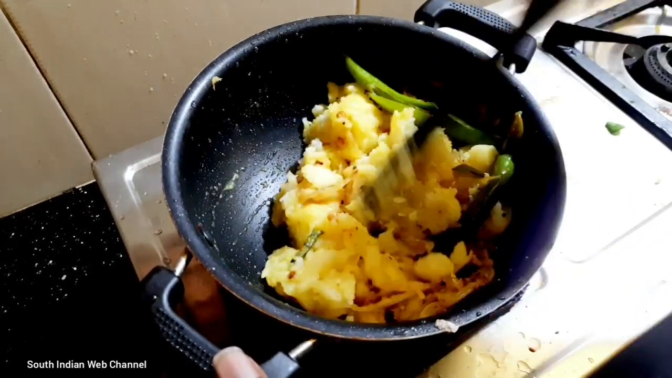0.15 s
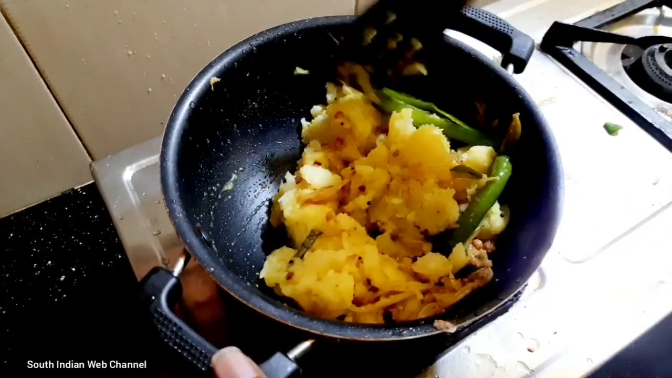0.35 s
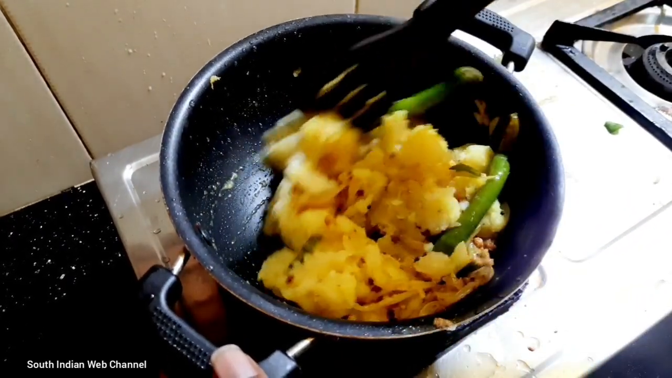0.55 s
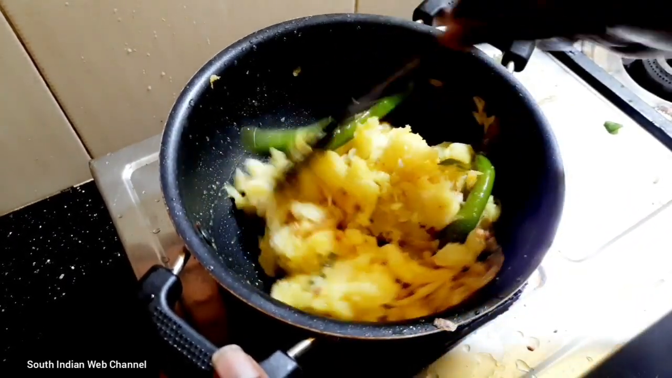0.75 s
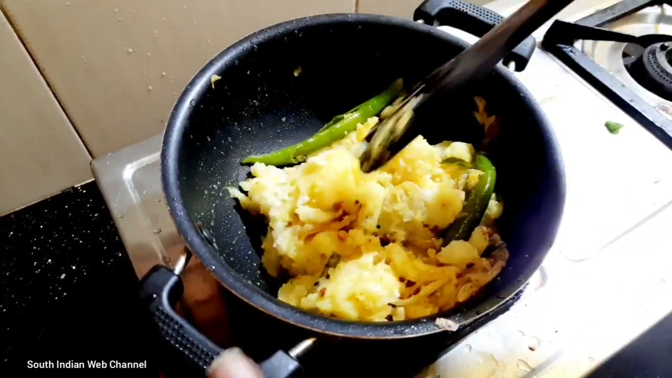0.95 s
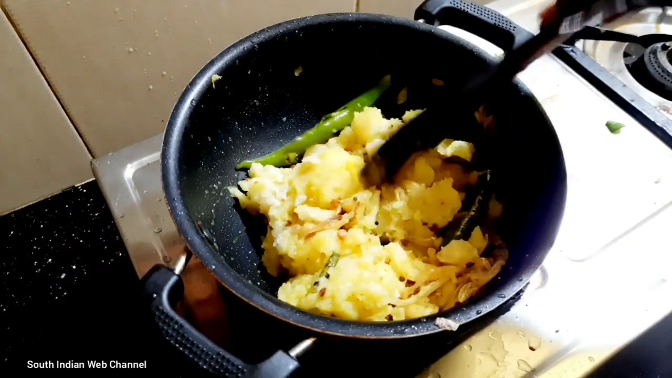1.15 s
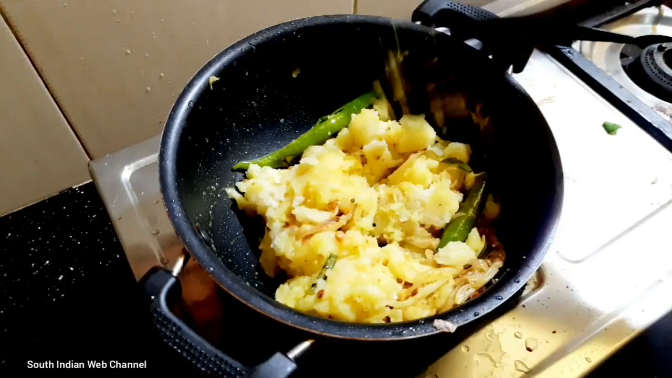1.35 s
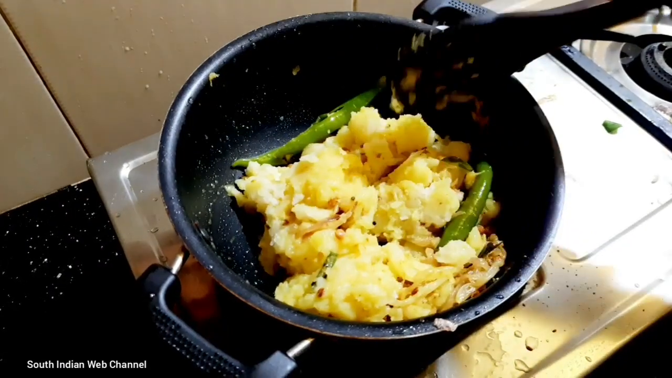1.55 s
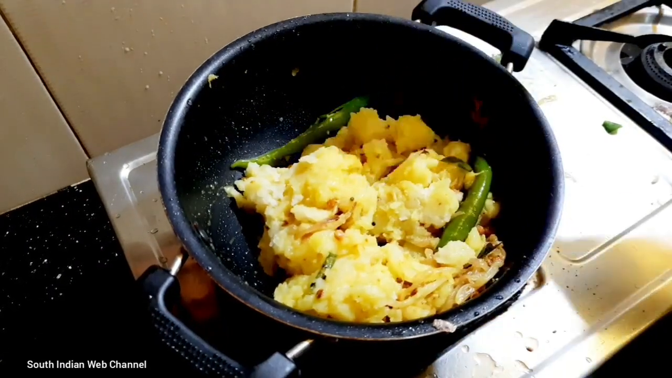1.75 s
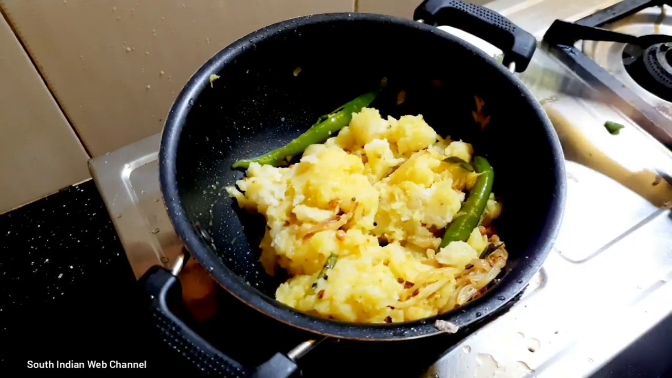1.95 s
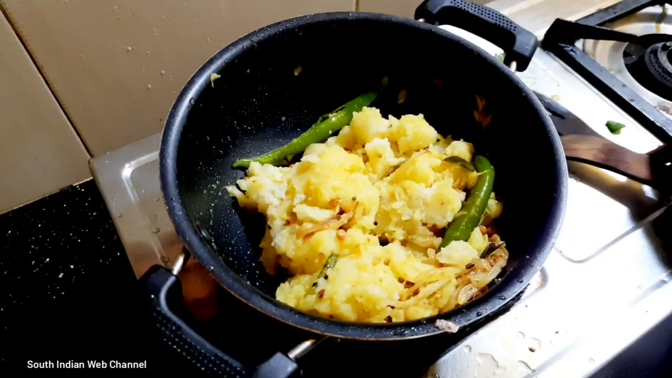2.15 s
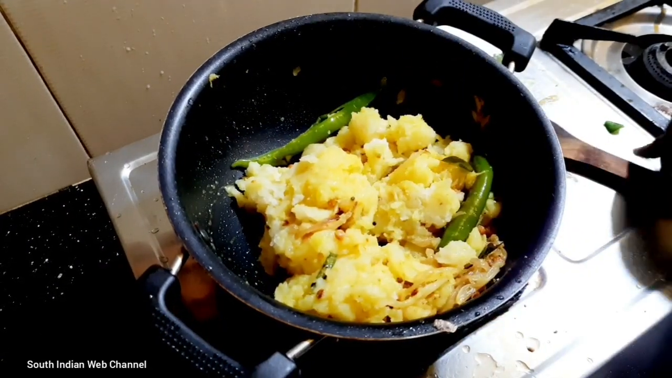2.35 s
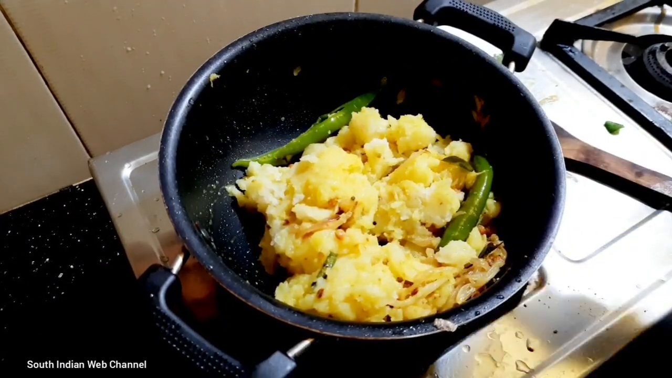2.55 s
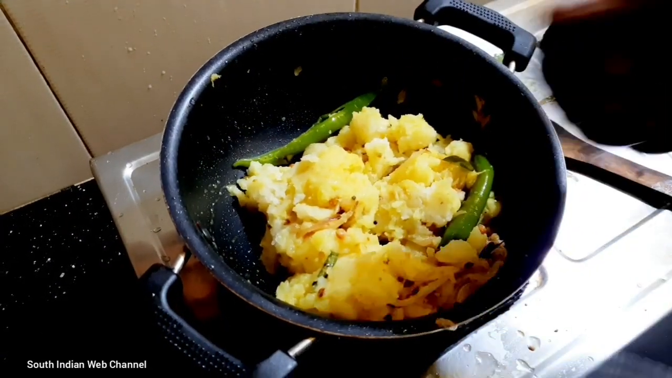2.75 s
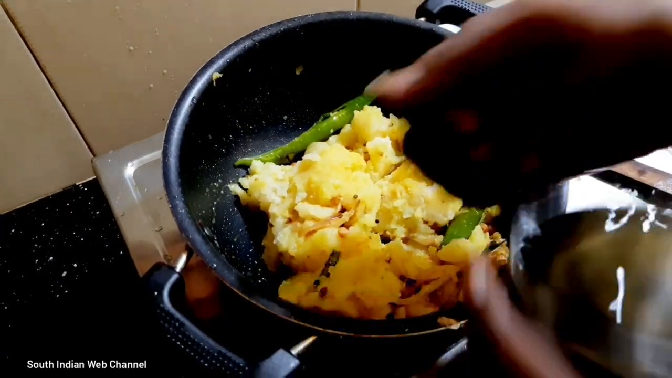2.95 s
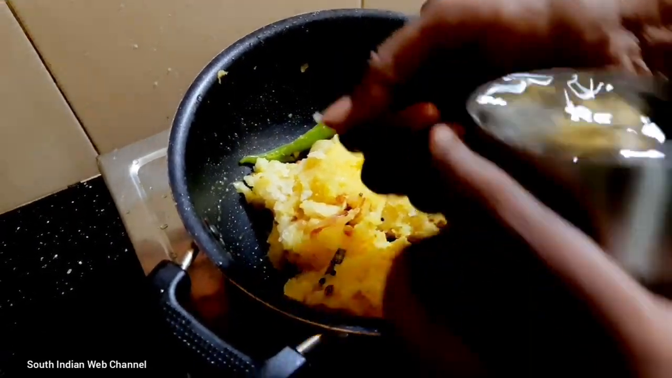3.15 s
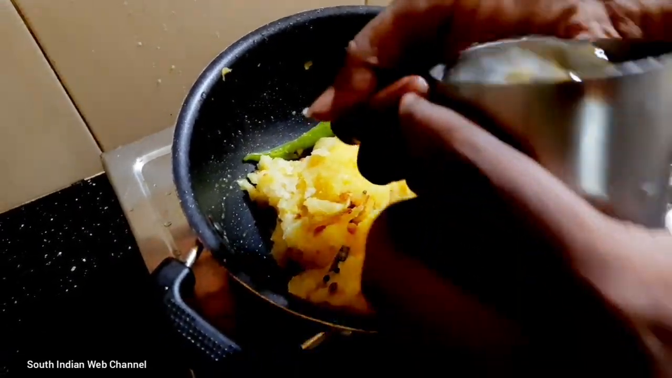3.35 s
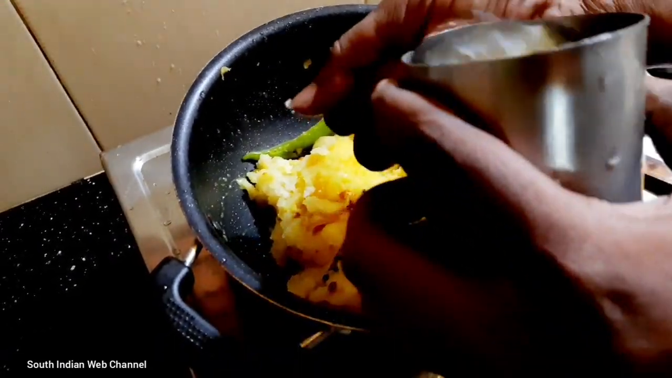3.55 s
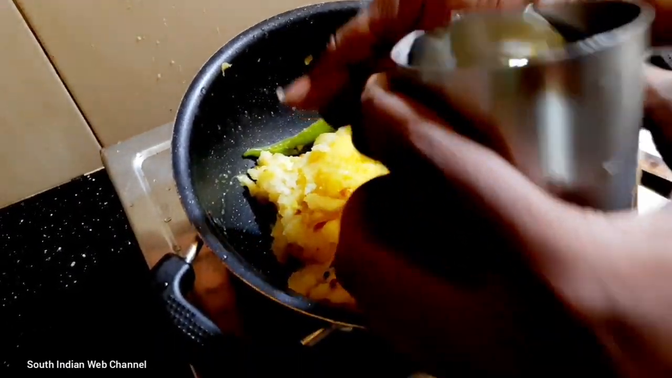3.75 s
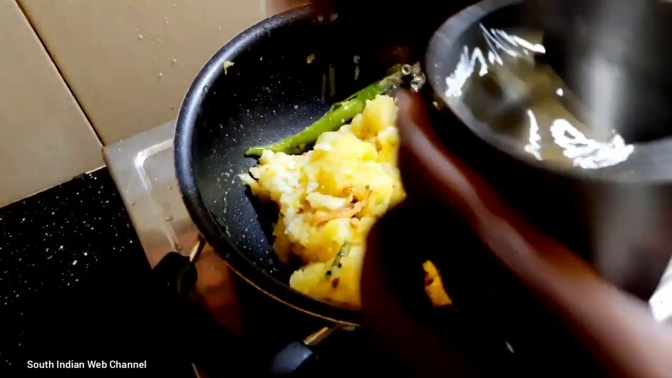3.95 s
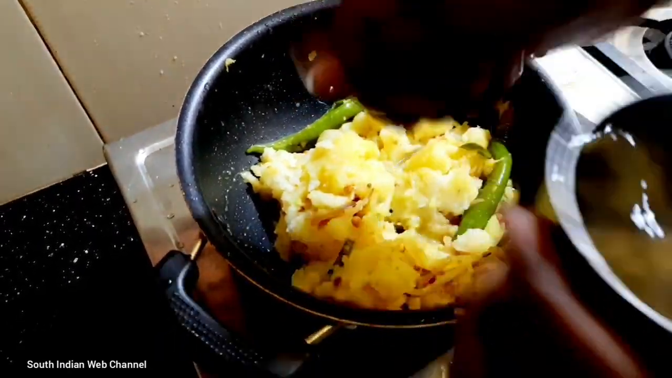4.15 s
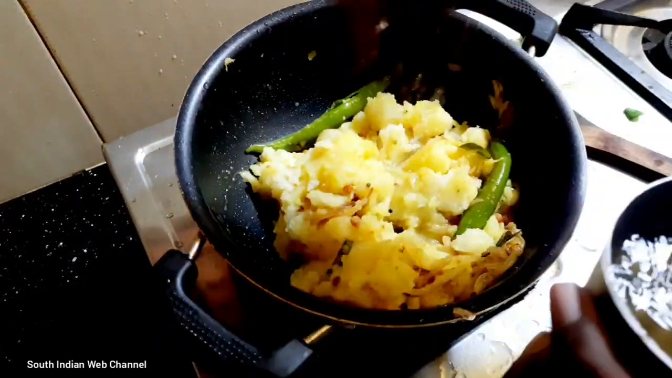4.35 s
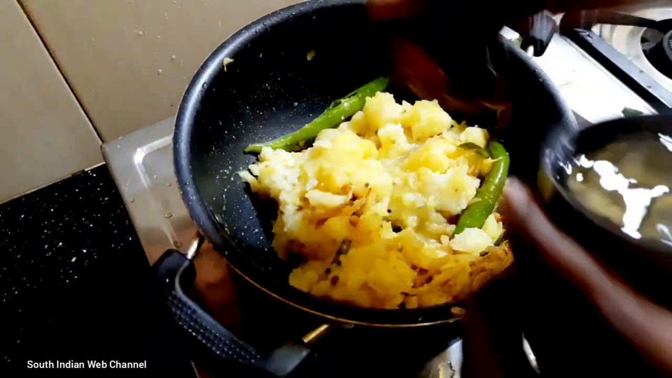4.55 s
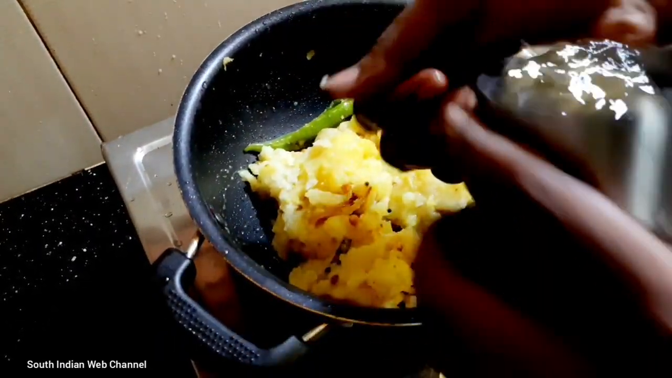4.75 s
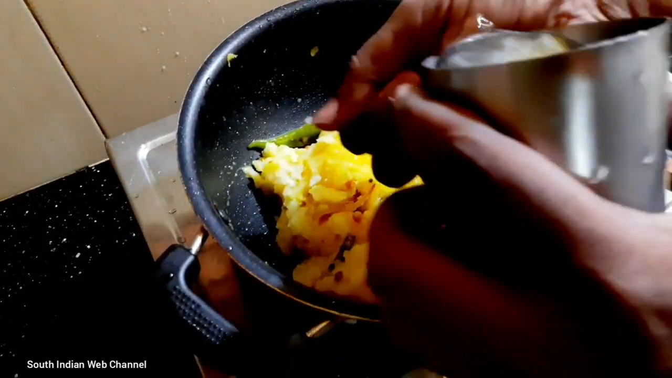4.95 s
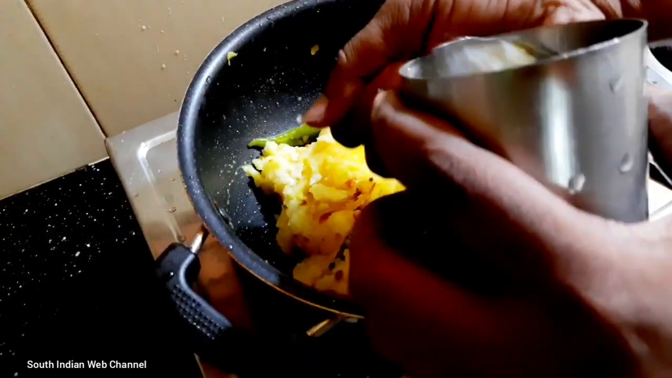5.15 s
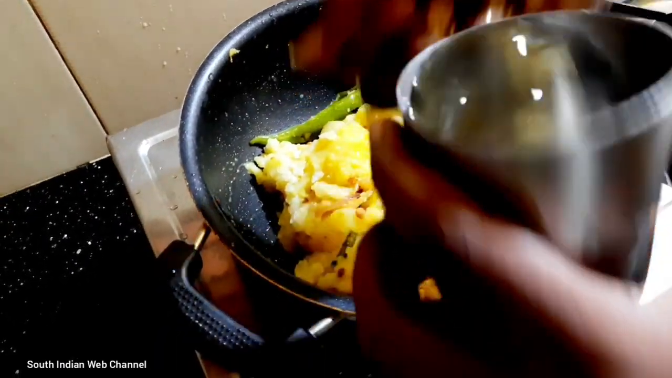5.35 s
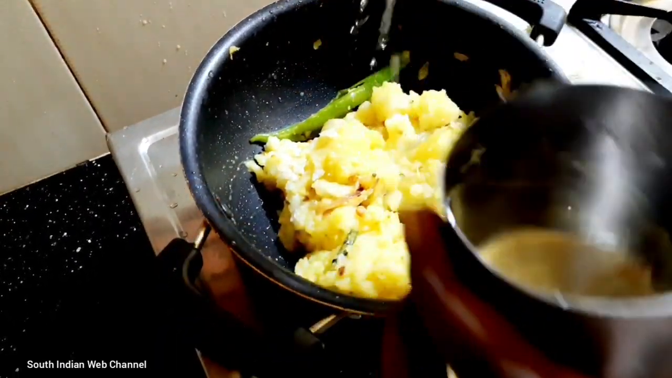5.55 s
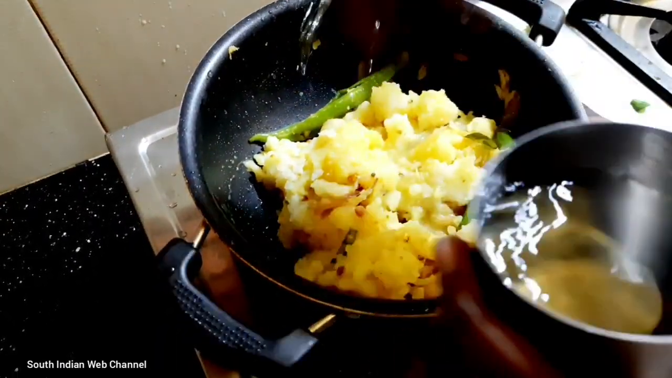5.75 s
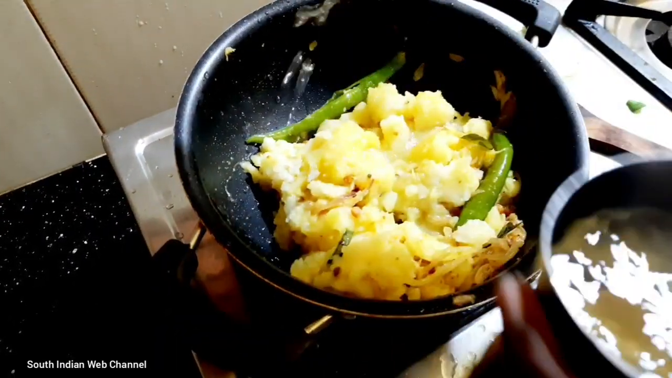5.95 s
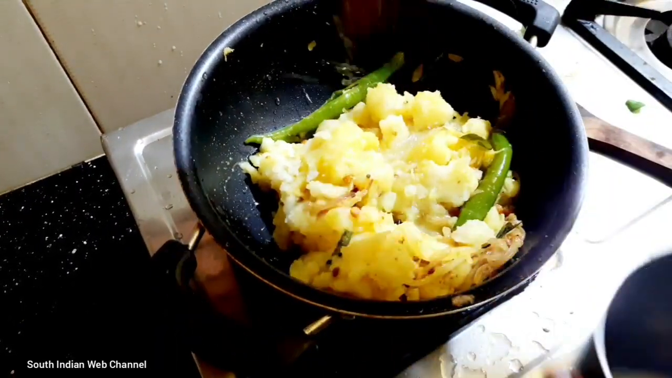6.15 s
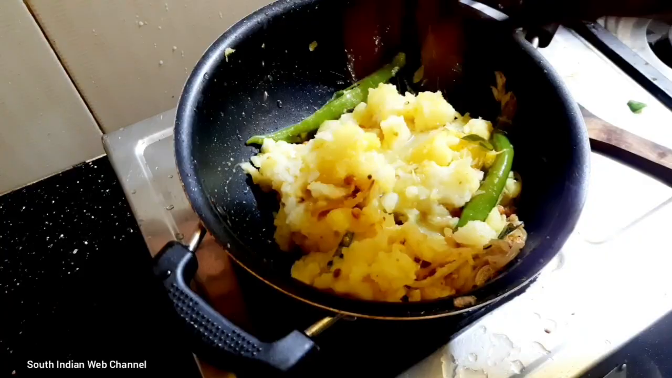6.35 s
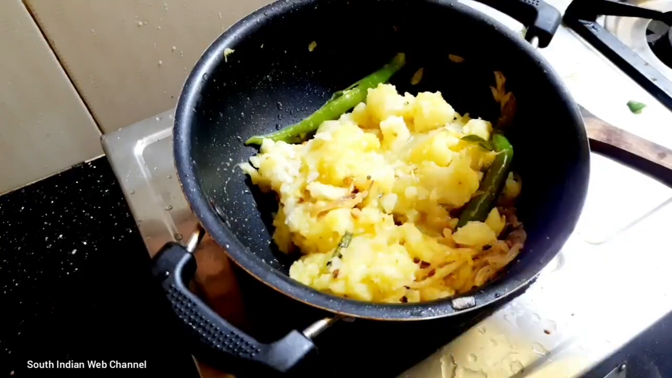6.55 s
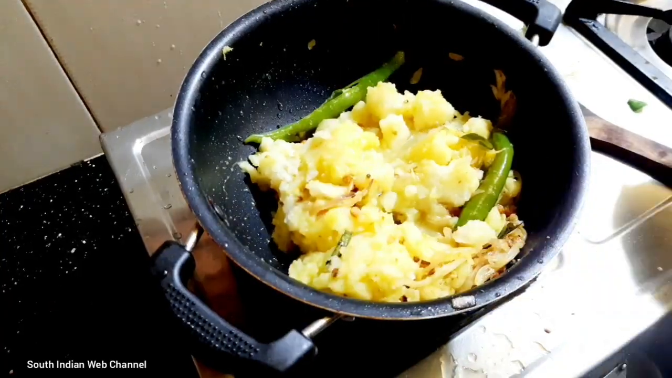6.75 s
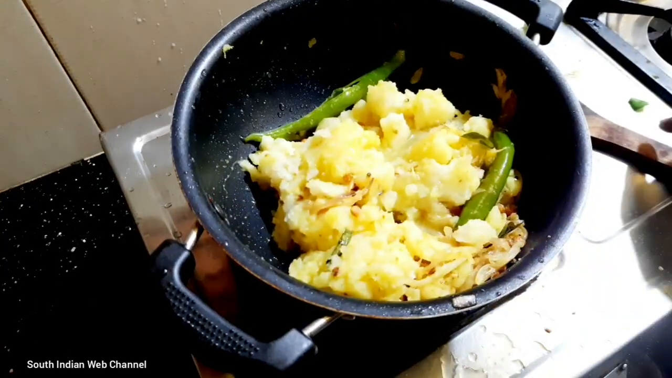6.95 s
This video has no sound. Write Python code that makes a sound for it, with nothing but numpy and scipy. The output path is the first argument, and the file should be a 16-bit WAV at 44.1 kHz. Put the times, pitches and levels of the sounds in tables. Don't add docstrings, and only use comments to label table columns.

```python
import sys
import numpy as np
from scipy import signal
from scipy.io import wavfile
from scipy.ndimage import uniform_filter1d

SR = 44100
rng = np.random.default_rng(int(sys.argv[2]) if len(sys.argv) > 2 else 0)


def master(y):
    cut = np.clip(np.atleast_2d(y).T, -1, 1)
    pcm = np.round(cut * 32767)
    wavfile.write(sys.argv[1], SR, pcm.astype(np.int16))


def boost(x):
    u = np.asarray(x, float) / 20
    return 10 ** u


N = 312669
LAG = 6
EDGE_HZ = 15950
PAN_SIDE_DB, TUMBLER_SIDE_DB = -1.45, -2.5

# start_s, peak_db, ring_db, ring_rise_s, room_db
KNOCKS = [
    (0.3998, -19, -15.5, 0.0049, 2.5),
    (1.3684, -16.5, -11, 0.0012, 5),
    (1.5408, 0, -16, 0.0043, -1),
    (2.022, -34, 8.5, 0.046, -25),
    (2.3636, -13, 1.5, 0.0083, 6),
    (6.921, -39, -6.5, 0.0034, 8.5),
]
# pitch_hz, left_right_db
LEAN = [(60, -0.5), (180, -4.5), (550, -1.5), (1650, -3.5), (4970, -1.5), (15000, 2.5)]


def evened(x):
    return x / np.sqrt(np.mean(x ** 2) + 1e-20)


def read(points, hz):
    f, value = np.transpose(points)
    return np.interp(np.log(hz + 1), np.log(f + 1), value)


def add(mix, s, sound, pan_db=0, lag=LAG):
    for side, late, sign in ((0, 0, 1), (1, lag, -1.12)):
        part = mix[side, round(s * SR) + late:][:sound.shape[-1]]
        part += boost(sign * pan_db) * np.atleast_2d(sound)[-side, :len(part)]


def hiss(tone, patchy_db, flicker_db, size=512, count=N):
    # pitch_hz, likeness (-1 to 1)
    likeness = [(60, 0.68), (180, 0.98), (550, 0.57), (1650, 0.53), (4970, -0.11), (15000, -0.34)]
    frames, hz = 4 * count // size + 5, np.fft.rfftfreq(size, 1 / SR)
    a, b, c, d, patches = rng.standard_normal((5, frames, len(hz)), dtype=np.float32)
    patches = uniform_filter1d(patches, size=6, axis=1)
    patches = evened(uniform_filter1d(patches, size=16, axis=0))
    flicker = evened(uniform_filter1d(rng.exponential(1, frames) - 1, size=3))[:, None]
    same = np.clip(read(likeness, hz), -1, 1)
    left = a + 1j * b
    right = same * left + np.sqrt(1 - same ** 2) * (c + 1j * d)
    right = right * np.exp(-2j * np.pi * hz * LAG / SR)
    lean = boost(read(LEAN, hz) / 2)
    shape = boost(read(tone, hz) + patchy_db * patches + flicker_db * flicker) * (hz < EDGE_HZ)
    z = np.array([(left * lean * shape).T, (right / lean * shape).T])
    return evened(signal.istft(z, nperseg=size, noverlap=3 * size // 4)[1][:, :count])


def kitchen(x):
    # pitch_hz, t60_s
    decay = [(120, 0.71), (300, 0.66), (800, 0.62), (2000, 0.58), (5000, 0.34), (12000, 0.055)]
    taps = np.zeros((2, SR // 2))
    at = np.arange(60, SR // 2 - 20, 20) + rng.integers(0, 20, (2, (SR // 2 - 61) // 20))
    np.put_along_axis(taps, at, rng.choice([-1., 1.], at.shape), 1)
    taps *= 1 + 1.8 * np.exp(-np.arange(SR // 2) / SR / 0.024)
    hz, t, z = signal.stft(taps, SR, nperseg=256)
    same = .9 * np.exp(-(hz[:, None] / 900) ** 2)
    z[1] = same * z[0] + np.sqrt(1 - same ** 2) * z[1]
    tail = signal.istft(z * boost(-60 * t / read(decay, hz)[:, None]), SR, nperseg=256)[1]
    return signal.fftconvolve(x, tail / np.linalg.norm(tail[0]), axes=1)


def coloured_click(tone):
    log_gain = np.log(boost(np.maximum(read(tone, abs(np.fft.fftfreq(4096, 1 / SR))), -100)))
    click = np.fft.ifft(np.exp(np.conj(signal.hilbert(log_gain)))).real[:2048]
    return click / abs(click).max()


def dented_ring(modes, spread, t):
    hz, db, t60 = np.transpose(modes)[:, :, None]
    turn = np.array([0, 1])[:, None, None] * rng.choice([-1, 1], hz.shape) * np.minimum(hz / 600, 1.25)
    place = (np.arange(6)[:, None, None] + rng.random((6, len(hz), 1))) / 6 - .5
    width_share = spread * np.minimum(hz / 600, 1) ** 3.5 * np.minimum(2000 / hz, 1) ** 1.5
    fade = boost(db - 60 * t / t60)
    return sum((fade * np.sin(2 * np.pi * hz * (1 + d) * t + turn)).sum(axis=1)
               for d in width_share * place) / 3.1


def knocks():
    # pitch_hz, slope-free level_db per Hz
    blows = [
        [(59, -68), (100, -15), (425, -4), (1020, -5), (1920, -10), (3110, -10.5), (6760, -20), (15000, -36)],
        [(59, -51), (100, -19), (558, 3), (1020, -7), (1660, -25.5), (2800, -16), (4940, -23), (15000, -41.5)],
        [(59, -58.5), (100, -11), (1290, -10.5), (2470, -17.5), (3460, -25), (5960, -18), (7670, -25),
         (15000, -31.5)],
        [(59, -47), (100, -35), (303, 19), (506, -3), (799, -6), (989, -38), (3900, -72), (6600, -120)],
        [(59, -62), (100, -30), (513, 0), (780, -11), (2370, -20), (4180, -22), (10700, -32.5), (15000, -46)],
        [(59, -46), (100, -29), (283, 7.5), (514, 2.5), (1170, -32), (3000, -48), (3900, -87), (6600, -120)],
    ]
    # pitch_hz, level_db, t60_s
    pan_rings = [
        [(307, -12, 0.54), (455, -9.5, 0.34), (790, -3, 0.079), (620, -2, 0.15), (990, -2, 0.09),
         (1700, -6, 0.086), (1940, 8, 0.048), (2340, 8.5, .04), (2600, 6.5, .05), (3100, 4, .04)],
        [(307, -16, 1), (372, -17.5, 0.14), (514, -11, 0.15), (665, -16, 0.2), (1017, 3, 0.046),
         (1176, 21.5, 0.007), (1294, -0.5, 0.03), (1890, 1, 0.045), (776, -14, .1), (452, -16, .15)],
        [(231, -24.5, 0.9), (264, -16.5, 0.59), (380, -11.5, 0.26), (429, -5.5, 0.19), (516, -3.5, 0.12),
         (802, -6, 0.32), (952, -2, 0.23), (1190, 27.5, 0.0068), (1750, -7, 0.14), (1400, -11.5, 0.2),
         (1150, -12, 0.17), (623, -5.5, 0.26), (3630, -25, 0.034), (5940, -23, .03)],
    ]
    # pitch_hz, level_db, t60_s
    stove_rings = [
        [(231, -12, 0.5), (307, -3.5, .75), (253, -17, 0.25), (574, -9, 0.35), (492, -17, 0.34),
         (775, 6, 0.097)],
        [(231, -17, 0.13), (307, -19.5, 0.35), (439, -16, 0.12), (526, -9.5, 0.079), (578, -8, 0.096),
         (663, -8.5, 0.09), (867, -14.5, 0.29), (1074, -12.5, 0.17), (1427, -5.5, 0.095), (1620, -19, 0.19),
         (1810, -12.5, 0.12), (2090, -18, 0.19), (2320, -11, 0.13), (2700, -22, 0.15)],
        [(231, 2, 0.29), (237, 5, 0.13), (312, -3.5, 0.22), (438, -1.5, 0.13), (580, -5, 0.1), (760, -6, 0.17)],
    ]
    # pitch_hz, first_rap_db, second_rap_db, t60_s
    spatula_ring = [(2556, -8, -10.5, 0.16), (3210, -12, -14, 0.041), (4120, -16, -12, 0.0411),
                    (4810, -12, -8, 0.055), (5910, -22, -15.5, 0.19), (7280, -22, -13, .035),
                    (8450, -26, -16, .03)]
    rim_from_s, rim_to_s = 1.3, 1.6
    out, t = np.zeros((2, N)), np.arange(SR // 2) / SR
    for (s, peak_db, ring_db, rise, room_db), tone, modes in zip(KNOCKS, blows, pan_rings + stove_rings):
        on_rim = rim_from_s < s < rim_to_s
        if on_rim:
            is_first = s == KNOCKS[1][0]
            modes = modes + [(f, first if is_first else second, t60) for f, first, second, t60 in spatula_ring]
        spread = .06 if s < rim_to_s else .1
        ring = dented_ring(modes, spread, t) * (1 - np.exp(-t / rise))
        hit, ringing = np.zeros((2, 2, SR // 2))
        add(hit, 0, coloured_click(tone), PAN_SIDE_DB, 2)
        add(ringing, 0, boost(ring_db) * ring, PAN_SIDE_DB, 0)
        echo = .7 * on_rim * np.roll(hit, round(.00084 * SR), axis=1)
        room = boost(room_db) * kitchen(hit + 0.37 * ringing)[:, :SR // 2]
        heard = hit + echo + ringing + room
        part = out[:, round(s * SR):][:, :SR // 2]
        part += boost(peak_db) * heard[:, :part.shape[1]]
    return out


def rubbing():
    # start_s, pressure_db, brightness_db
    strokes = [
        (0, -57, 7),
        (.09, -53, 6.5),
        (.16, -55.5, 4),
        (.33, -51.5, 1),
        (.5, -54.5, 3),
        (.65, -51.5, 3.5),
        (.76, -62, -8),
        (1.02, -52, -11),
        (1.3, -54, -8),
        (2, -68, -13),
    ]
    # pitch_hz, level_db per Hz
    stir_tone = [(590, -30), (1000, -18), (1660, 1), (2580, -8), (3250, -3.5), (4140, -19.5), (6500, -48),
                 (11000, -120)]
    # pitch_hz, level_db per Hz
    drag_tone = [(180, -30), (300, 1.5), (469, -12), (656, -2.5), (1200, -27.5), (1560, -57), (2640, -120)]
    out, t = np.zeros((2, N)), np.arange(2 * SR) / SR
    at, pressure_db, bright_db = np.transpose(strokes)
    stir = hiss(stir_tone, 2.6, 1.255, count=2 * SR)
    dull = signal.sosfiltfilt(signal.butter(4, 2300, fs=SR, output="sos"), stir)
    bright = boost(np.interp(t, at, bright_db)) * (stir - dull)
    out[:, :2 * SR] = boost(np.interp(t, at, pressure_db)) * (dull + bright)
    drag_s, drag_db, drag_rise_s = 6.92, -50.5, 0.024
    left = N - round(drag_s * SR)
    onset = np.minimum(t[:left] / drag_rise_s, 1)
    out[:, -left:] = boost(drag_db) * onset * hiss(drag_tone, 1.9, 2.1, size=1024, count=left)
    return out


def ping(hz, t60, spread, glide, chance):
    t = np.arange(round(t60 * SR) + 50) / SR
    bent = t * (1 + glide * t / t60)
    tones = 0
    for k, c in enumerate(chance):
        partial_hz = min(hz * (1 + spread * ((k + c) / len(chance) - .5)), EDGE_HZ)
        tones = tones + np.sin(2 * np.pi * partial_hz * bent)
    sound = tones * boost(-60 * t / t60) * (1 - np.exp(-t * hz / (.5 + 14 * glide)))
    return sound / abs(sound).max()


def small_contacts():
    # start_s, peak_db, pitch_hz
    rebounds = [(0.439, -25.5, 307), (0.478, -35, 476), (1.175, -34, 246), (1.186, -39, 800),
                (1.197, -35, 650), (1.203, -30, 253), (1.224, -29, 442), (1.395, -8.5, 312),
                (1.559, 1.5, 533), (2.032, -7, 287), (2.076, -36, 307), (2.235, -25, 352),
                (2.246, -25, 435), (2.27, -26, 423), (2.3804, 1.5, 554), (2.394, -9, 510),
                (2.423, -14, 600), (2.412, -14.5, 310), (.412, -17, 650), (0.427, -21.5, 397),
                (1.4, -15.5, 700), (1.55, -1, 980), (2.67, -38, 450), (6.937, -22, 250), (6.98, -30, 231),
                (6.999, -35, 234), (7.041, -31, 264)]
    # start_s, peak_db, pitch_hz
    ticks = [(.071, -35, 1700), (.664, -39, 1750), (.854, -50, 1340), (.888, -43, 1390), (.921, -39, 1500),
             (.974, -41, 1630), (2.771, -40, 1490), (2.799, -41, 1520), (2.92, -39.5, 1490),
             (2.999, -39.5, 1100), (3.154, -41, 1280), (3.26, -40, 1490), (.395, -33, 1700),
             (0.3426, -35, 1700), (.343, -37, 3190), (0.4588, -29, 1900), (0.5648, -31.5, 1670),
             (0.809, -37.5, 1530), (1.0373, -33.5, 1520), (1.266, -32.5, 910), (1.7674, -60, 972),
             (1.974, -31, 1420), (2.1386, -27.5, 1430), (2.5728, -39, 1030), (2.599, -36.5, 1090),
             (2.6831, -30.5, 1470), (2.7112, -33.5, 1510), (3.0213, -36.5, 1860), (3.1082, -36, 1850)]
    # start_s, peak_db, pitch_hz
    drops = [(3.4598, -36.5, 1600), (3.492, -40, 1340), (5.086, -45, 1000), (5.034, -44, 1050),
             (5.198, -47, 1400), (5.7815, -42, 1800), (3.7362, -34.5, 1400), (3.7514, -41, 1030),
             (3.9396, -34.5, 1350), (3.813, -43, 1700), (4.079, -52, 1500), (4.106, -40, 1680),
             (4.324, -40.5, 1520), (4.691, -42.5, 1530), (4.879, -48.5, 900), (4.217, -37, 1550),
             (4.2745, -39.5, 1620), (4.3642, -39.5, 1434), (4.5421, -38.5, 1470), (4.5564, -38.5, 1510),
             (4.9924, -41, 1550), (5.0558, -43.5, 1100), (5.1228, -39, 1100), (5.3618, -42, 1610),
             (5.421, -44, 1510), (5.5024, -38.5, 1370), (5.5483, -42, 1330), (5.572, -45, 1450),
             (5.713, -35.5, 1505), (5.7723, -38.5, 1470)]
    # start_s, peak_db, pitch_hz, left_right_db
    spits = [(1.038, -32, 8900, -7.5), (2.138, -32, 12500, -3), (1.267, -44, 3600, -8),
             (1.16, -42, 8500, -2), (1.702, -34, 8000, -2), (1.965, -35, 9500, -4), (2.139, -31, 4800, -2),
             (3.4598, -26, 5500, 0), (3.4598, -32, 12000, 6), (2.9, -34, 4800, 2), (3.9, -27, 7400, 4),
             (4.997, -38, 13000, 0), (4.88, -44, 8000, 1), (5.8105, -32, 4600, 6), (5.82, -38, 3800, 2),
             (3.919, -41, 12000, 3), (4.9933, -47, 5270, 12), (5.054, -49, 9700, 14),
             (5.123, -50, 13100, 15), (5.8017, -32, 6300, 0), (5.805, -35, 5800, 0),
             (5.3612, -37, 9900, -2), (5.713, -41, 5540, -3), (5.7718, -33, 4800, 4.5),
             (5.8095, -30, 12900, 3), (5.8312, -33, 12600, 4)]
    # start_s, peak_db, starting pitch_hz, t60_s
    plinks = [(1.191, -40.5, 2840, 0.05), (3.747, -28.5, 3470, 0.016), (3.781, -30, 2700, 0.005),
              (3.785, -37, 2900, .008), (3.791, -34, 3050, 0.012), (3.818, -35, 2750, 0.012),
              (3.822, -36, 2860, .02), (4.1481, -23.5, 2050, 0.0097), (4.151, -26.5, 2300, 0.0067),
              (4.1548, -31, 2230, .01), (4.192, -40.5, 2500, 0.011), (4.568, -46, 1370, 0.022),
              (4.693, -39.5, 4700, 0.0148), (5.018, -31.5, 2690, 0.0073), (5.056, -35, 3100, 0.0064),
              (5.146, -32.5, 3020, 0.0072), (4.907, -34.5, 3730, 0.0092), (5.1683, -39, 8700, 0.017),
              (5.811, -28, 3420, 0.011), (5.817, -38, 2600, .012), (5.823, -40, 2900, .01),
              (5.832, -33, 2600, 0.012), (5.831, -37, 3500, .008), (5.84, -39, 2700, .012),
              (5.846, -40, 3000, .01), (5.749, -39, 3600, .008), (5.735, -44, 2560, .008),
              (5.004, -43, 2000, .01), (5.024, -42, 3000, .01)]
    bumps, water, bubbles = np.zeros((3, 2, N))
    for (s, db, hz), chance in zip(rebounds, rng.random((len(rebounds), 4))):
        add(bumps, s, boost(db - 14.0) * ping(hz, 13 / hz, 0.21, 0, chance), PAN_SIDE_DB, 1)
    for table, pan_db in ((ticks, PAN_SIDE_DB), (drops, TUMBLER_SIDE_DB)):
        for (s, db, hz), chance in zip(table, rng.random((len(table), 5))):
            add(water, s, -boost(db) * ping(hz, 0.0035, .35, 0, chance), pan_db)
    for (s, db, hz, pan_db), chance in zip(spits, rng.random((len(spits), 12))):
        add(water, s, -boost(db) * ping(hz, 0.008, .6, 0, chance), pan_db)
    for (s, db, hz, t60), chance in zip(plinks, rng.random((len(plinks), 3))):
        add(bubbles, s, -boost(db) * ping(hz, t60, .1, .15, chance), PAN_SIDE_DB)
    to_room = boost(-5.5) * bumps + boost(-4.0) * water + boost(-17) * bubbles
    return bumps + water + bubbles + kitchen(to_room)[:, :N]


def crackle(level, per_s, hz):
    size_db = 4.5 * np.minimum(rng.exponential(1, (2, N)), 4)
    size = boost(size_db) * (rng.random((2, N)) < per_s / SR)
    size[1] += np.roll(size[0], LAG)
    u = np.arange(round(3 * SR / hz)) * hz / SR
    click = -np.sin(2 * np.pi * u) * np.sin(np.pi * u / 3) ** 2 * np.exp(-u)
    return level * evened(signal.oaconvolve(size, click[None], axes=1)[:, :N])


def splashes():
    # start_s (of the peak), peak_db, rise_s, fall_s
    bursts = [
        (.094, -48, 0.089, 0.045),
        (1.04, -48, 0.025, 0.14),
        (1.153, -51.5, .004, 0.062),
        (3.459, -47.5, 0.0035, 0.09),
        (3.924, -50, .015, 0.035),
        (5.014, -60, 0.037, 0.15),
        (5.79, -47, 0.049, 0.1),
        (5.812, -39.5, 0.012, 0.042),
    ]
    # pitch_hz, level_db per Hz
    burst_tone = [(880, -69.5), (1500, 1), (2140, -19), (2610, 2.5), (4080, -2.5), (4830, 2), (13000, -2),
                  (16000, 0.5)]
    t, power = np.arange(N) / SR, 0
    for s, db, rise, fall in bursts:
        away = np.maximum((s - t) / rise, (t - s) / fall)
        power = power + boost(db - 15 * away) ** 2
    level = np.sqrt(power)
    return level * hiss(burst_tone, 3.5, 1.2) + crackle(boost(-7) * level, 2500, 7000)


def shoves():
    # start_s, peak_db, pitch_hz
    pushes = [
        (0.865, -38, 93),
        (0.885, -35, 102),
        (1.016, -47, 69),
        (1.11, -47.5, 101),
        (1.128, -50, 80),
        (1.143, -48, 108),
        (1.177, -48, 97),
        (1.319, -61, 90),
    ]
    out, cycles = np.zeros((2, N)), 1.72
    for s, db, hz in pushes:
        u = np.arange(round(cycles / hz * SR)) / SR * hz
        add(out, s, boost(db) * np.sin(2 * np.pi * u) * np.sin(np.pi * u / cycles), -13)
    return out


def simmer():
    # start_s, level_db
    liveliness = [(0, -0.7), (0.59, 0.3), (1.3, -2), (2.6, -1), (3.3, -4), (4.05, -0.7), (4.75, -4.5),
                  (5.75, -3.5), (6.25, -6.5), (6.85, -6.5), (7.09, -5)]
    # pitch_hz, level_db per Hz
    wet_tone = [(350, -12.5), (600, -5), (1080, -8.5), (1990, -5.5), (2430, -8), (4500, -17.5), (5850, -28),
                (9900, -120)]
    # pitch_hz, level_db per Hz
    fizz_tone = [(1760, -10), (3000, -2), (5560, 2), (6130, 0.5), (8820, -1.5), (11000, -6.5),
                 (13000, -0.5), (16000, -3.5)]
    t = np.arange(N) / SR
    lively_db = np.interp(t, *np.transpose(liveliness))
    swell_db, swell_s = 13.5, 0.087
    swells = sum(boost(db / 2) * (t > s) * np.exp(-abs(t - s) / swell_s) for s, db, *_ in KNOCKS)
    lively_db = lively_db + swell_db * swells
    wet = boost(-53 + 1.5 * lively_db)
    fizz = boost(-53 + lively_db)
    body = wet * hiss(wet_tone, 1.6, 0.93) + crackle(boost(-13.0) * wet, 150, 1200)
    return body + fizz * hiss(fizz_tone, 1.7, 0.72) + crackle(boost(-14) * fizz, 179, 9350)


def hum():
    # shaft_order, level_db (rms)
    orders = [
        (1, -60),
        (3, -71),
        (6, -73.5),
        (8, -68.5),
        (9, -66),
        (10, -63.5),
    ]
    motor_hz = 49.08
    t, out = np.arange(0, N + 256, 256) / SR, np.zeros((2, N))

    def slow():
        waver = sum(np.sin(2 * np.pi * (f * t + rng.random())) / np.sqrt(f) for f in np.geomspace(.2, 6, 8))
        return np.interp(np.arange(N) / SR, t, evened(waver))

    turns = np.cumsum(motor_hz * (1 + 0.0017 * slow())) / SR
    for order, db in orders:
        level = np.sqrt(2) * boost(db + 0.51 * slow())
        tone = level * np.sin(2 * np.pi * (order * turns + rng.random()))
        add(out, 0, tone, read(LEAN, order * motor_hz))
    return out


def room_air():
    # pitch_hz, level_db per Hz
    air_tone = [(35, -14.5), (60, -27.5), (92, 1.5), (142, -2.5), (194, -7.5), (286, 0), (341, -5.5),
                (490, -3), (569, -13), (975, -37), (1500, -8.5), (1950, -43), (3300, -120)]
    # pitch_hz, level_db per Hz
    rumble_tone = [(60, -41.5), (95, -8), (138, 25), (165, -15), (230, -54)]
    air = boost(-59) * hiss(air_tone, 2.85, 0.884, size=4096)
    return air + boost(-64.5) * hiss(rumble_tone, 0.32, 1.8, size=2048)


def scene():
    cooking = knocks() + rubbing() + small_contacts() + splashes() + shoves()
    return cooking + simmer() + hum() + room_air()


def band_limit(x):
    return signal.sosfilt(signal.butter(12, 16840, fs=SR, output="sos"), x)


def record(dry):
    limited = np.tanh(dry * 1.04) / 0.98
    edge = signal.firwin(511, 16450, window=("kaiser", 9), fs=SR)
    mix = signal.oaconvolve(limited, edge[None], "same")
    return band_limit(mix)


dry = scene()
out = record(dry)
master(out)
```